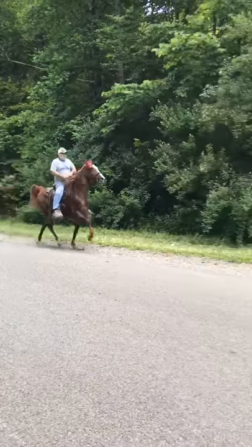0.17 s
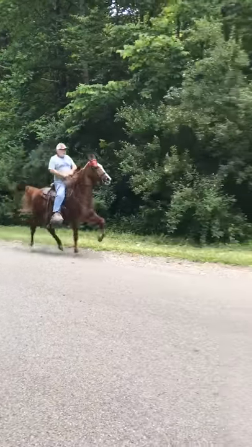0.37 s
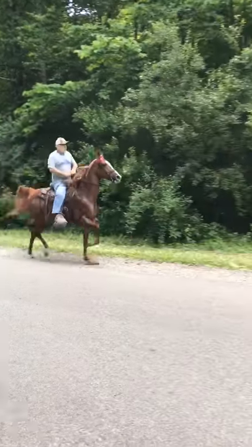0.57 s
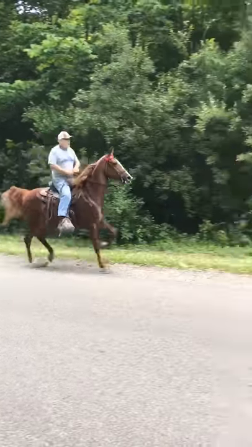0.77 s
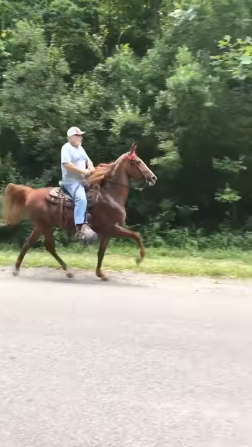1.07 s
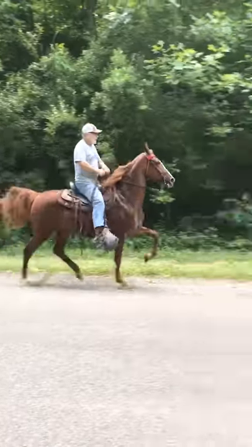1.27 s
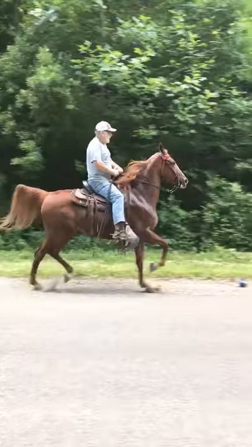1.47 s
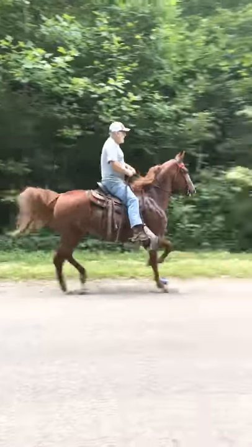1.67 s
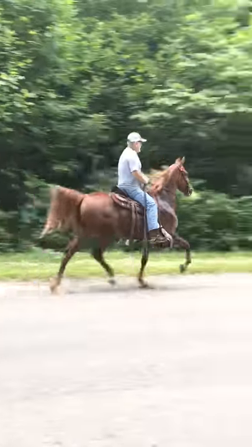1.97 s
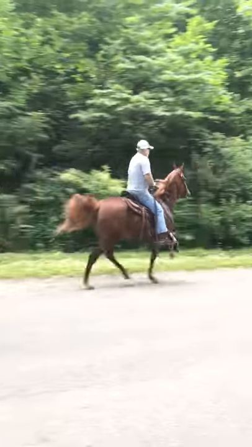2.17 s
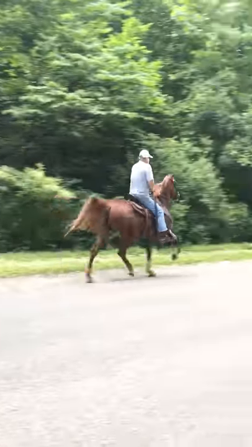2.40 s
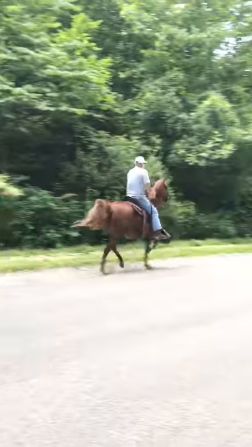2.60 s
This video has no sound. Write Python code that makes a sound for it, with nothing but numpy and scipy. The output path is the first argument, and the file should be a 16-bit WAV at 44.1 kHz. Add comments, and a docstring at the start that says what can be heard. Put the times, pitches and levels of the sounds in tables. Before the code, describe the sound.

Hoofbeats of one shod horse at a fast gait on asphalt, faint at first, then louder and close, with gritty scrapes between steps; low wind rumble and thin hiss outdoors, single handheld microphone at the roadside.

```python
"""Light wind rumbles on the microphone under a thin top hiss and a faint patter of hooves from the trees;
all the while a shod horse goes at a fast gait on a paved road, faint at first, louder from about 0.8 s.
Each hoof contact is a short gritty run of random knocks that rings broad resonances and pushes the road.
Shoes drag as fine grit, skidding shoes sing through one resonance, and ticks are brief bright noise.
Wind is low band noise with wobbling puffs; the air is coloured noise whose top flickers."""
import sys
import numpy as np
from scipy import signal
from scipy.fft import rfft, irfft
from scipy.io import wavfile

SR = 44100
rng = np.random.default_rng(int(sys.argv[2]) if len(sys.argv) > 2 else 0)


def master(y):
    """Save y as 16-bit WAV."""
    cut = np.clip(np.atleast_2d(y).T, -1, 1)
    pcm = np.round(cut * 32767)  # scale
    wavfile.write(sys.argv[1], SR, pcm.astype(np.int16))


N = 120834  # samples

FINE_GRAINS_PER_S = 2500  # for dragging shoes and the patter


def from_db(db):
    """Decibels to gain."""
    return 10 ** (np.asarray(db) / 20)


def rms_one(x):
    """Scale to rms 1."""
    return x / np.sqrt(np.mean(x ** 2) + 1e-20)


def in_time(rows):
    """Table columns, after the first in seconds, as curves over time."""
    seconds, *columns = np.transpose(rows)
    return [np.interp(np.arange(N) / SR, seconds, column) for column in columns]


def drift(rate_hz):
    """Slow random wander with rms 1: noise through two equal one-pole low-passes."""
    r = np.exp(-2 * np.pi * rate_hz / SR)
    wander = signal.lfilter([1], [1, -2 * r, r * r], rng.standard_normal(N + SR))
    return rms_one(wander[SR:])  # the first second lets the filter settle


def band_pass(x, edges_hz):
    """Steep-sided band between two edges."""
    return signal.sosfilt(signal.butter(3, edges_hz, "band", fs=SR, output="sos"), x)


def grains(per_s, spread_db):
    """Random clicks of uneven size and either sign, rms 1."""
    size_db = spread_db * np.minimum(rng.exponential(1, N), 4)
    sizes = from_db(size_db) * rng.choice([-1, 1], N)
    return rms_one(sizes * (rng.random(N) < per_s / SR))


def resonate(x, group):
    """Parallel resonances, each passed twice; unit noise in gives unit rms out."""
    pulse = np.zeros(4096)  # its response gives the gain of the whole group
    pulse[0] = 1
    both = np.concatenate([pulse, x + 1e-18])
    out = 0
    for k, (hz, width_hz, db) in enumerate(group):
        r = np.exp(-np.pi * width_hz / SR)
        b = [(1 - r * r) / 2, 0, (r * r - 1) / 2]
        a = [1, -2 * r * np.cos(2 * np.pi * hz / SR), r * r]
        ringing = signal.lfilter(b, a, signal.lfilter(b, a, both))
        out = out + (-1) ** k * from_db(db) * ringing
    return out[len(pulse):] / np.sqrt(np.sum(out[:len(pulse)] ** 2))


def wind():
    """Wind on the microphone: lumpy low noise in two bands."""
    # Each row: time in seconds, deep rumble in dB, upper rumble in dB.
    wind_levels = [(0, -52, -55), (.1, -44.5, -52), (.4, -43.5, -41.5), (.55, -41.5, -34.5),
                   (.8, -44.5, -42.5), (1.2, -43.5, -52), (1.75, -43, -50), (2.74, -41.5, -52)]
    deep_hz, upper_hz = (47.2, 122), (93, 252.7)
    gust_db, gust_rate_hz = 3.5, 12.0
    bands = [rms_one(band_pass(rng.standard_normal(N + SR), hz)[SR:]) for hz in (deep_hz, upper_hz)]
    rumble = 0
    for level_db, band in zip(in_time(wind_levels), bands):
        rumble = rumble + from_db(level_db + gust_db * drift(gust_rate_hz)) * band
    return rumble


def air():
    """Still air as steady coloured noise, with a top hiss that swells and flickers a little."""
    # Colour of the air. Each row: frequency in Hz, relative density in dB per Hz.
    air_colour = [(250, -36), (400, -18), (2200, -8), (5200, -20), (7600, -33), (10400, -37.5),
                  (14000, -29.5), (16800, -13.5)]
    # Gain of the top hiss. Each row: time in seconds, gain in dB.
    top_gain = [(1.6, -3), (1.8, 0.5), (2.4, -2.5)]
    air_db, top_from_hz = -54, 14500  # air_db is the rms before the top gain
    top_flicker_db, flicker_rate_hz = 2.5, 27
    hz = np.fft.rfftfreq(N, 1 / SR)
    at_hz, density_db = np.transpose(air_colour)
    colour = from_db(np.interp(np.log(hz + 1), np.log(at_hz), density_db)) * (hz > at_hz[0])
    noise = rfft(rng.standard_normal(N)) * colour
    scale = from_db(air_db) / np.std(irfft(noise, N))
    steady = irfft(noise * (hz < top_from_hz), N)
    top = irfft(noise * (hz >= top_from_hz), N)
    top_db = in_time(top_gain)[0] + top_flicker_db * drift(flicker_rate_hz)
    return scale * (steady + from_db(top_db) * top)


def patter():
    """Hooves returned by the trees: a blurred, flickering bed of grains to drive the hoof colours."""
    # Each row: time in seconds, level in dB.
    patter_levels = [(0, -40), (1.3, -35), (2.74, -37.5)]
    # Offsets in dB for the low, middle and high knock and the grit.
    patter_mix_db = [-17.5, -12, -8.5, -21.5]
    flicker_db, flicker_rate_hz, spread_db = 3.5, 20.0, 3.5
    level_db, = in_time(patter_levels)
    drives_db = [db + level_db + flicker_db * drift(flicker_rate_hz) for db in patter_mix_db]
    return from_db(drives_db) * grains(FINE_GRAINS_PER_S, spread_db)


def knock(x, edges_hz):
    """One broad, steep-sided resonance; unit noise in gives unit rms out."""
    low_hz, high_hz = edges_hz
    return band_pass(x + 1e-18, edges_hz) * np.sqrt(SR / 2 / (high_hz - low_hz))


def hoof(drives):
    """Three drives ring the hoof on the road, the fourth is grit; the lowest also pushes the road."""
    # Broad resonances, one per knock drive. Each row: low edge in Hz, high edge in Hz.
    knock_edges = [(530, 777), (940, 1205), (1330, 1735)]
    # Colour of crushed grit. Each row: centre in Hz, width in Hz, relative level in dB.
    grit_colour = [(2776, 820, 8.5), (3890, 2530, -7), (5006, 1880, -3.5), (8550, 1950, -26.5),
                   (13000, 3000, -26)]
    thud_hz, thud_width_hz, thud_db = 165, 199, -7.5  # level relative to the low knock
    rings = sum(knock(x, edges_hz) for x, edges_hz in zip(drives, knock_edges))
    grit = resonate(drives[3], grit_colour)
    thud = from_db(thud_db) * resonate(drives[0], [(thud_hz, thud_width_hz, 0)])
    return rings + grit + thud


def contacts():
    """Each hoof contact drives a burst of knocks and of grit: quick rise, hold, short release."""
    # Each row: start in seconds, length in seconds, low, middle and high knock in dB, grit in dB.
    landings = [(0.1, 0.0048, -38.5, -43, -36, -49), (0.122, 0.036, -46, -47, -39, -54.5),
                (0.212, 0.0078, -43, -39, -36.5, -50), (0.244, 0.0049, -36.5, -51, -41, -65),
                (0.37, 0.0038, -44, -41, -29.5, -42), (0.379, 0.0067, -43, -39, -36, -55),
                (0.412, 0.016, -35, -32, -38, -44.5), (0.578, 0.007, -40.5, -38, -35.5, -50),
                (0.587, 0.012, -39, -37, -36, -44.5), (0.645, 0.021, -40, -41, -35.5, -48.5),
                (0.823, 0.013, -33.5, -33.5, -20, -41.5), (0.864, 0.019, -32, -31, -30, -40.5),
                (0.886, 0.013, -58, -40, -34.5, -47.5), (1.03, 0.0091, -31.5, -27.5, -33.5, -43.5),
                (1.044, 0.0094, -44, -40, -28.5, -40), (1.108, 0.0059, -31, -33, -18, -36.5),
                (1.266, 0.018, -35, -51, -35, -45.5), (1.318, 0.014, -32.5, -29.5, -38.5, -45),
                (1.338, 0.0072, -31.5, -37, -29, -39.5), (1.373, 0.0075, -32.5, -49, -37, -41.5),
                (1.469, 0.0099, -27, -33, -27, -39.5), (1.559, 0.0044, -25.5, -24.5, -24.5, -38),
                (1.573, 0.014, -38, -27, -32.5, -46.5), (1.635, 0.0059, -44.5, -38, -36.5, -45.5),
                (1.694, 0.0082, -32.5, -32, -27.5, -44.5), (1.736, 0.018, -39, -35, -42, -45),
                (1.759, 0.016, -34.5, -41, -29, -43.5), (1.901, 0.024, -33, -32, -36, -43),
                (1.99, 0.00362, -19, -23, -24.5, -37), (2.081, 0.0049, -45, -35.5, -30, -46.5),
                (2.088, 0.023, -47, -42, -38.5, -49.5), (2.119, 0.017, -42, -43, -36, -44.5),
                (2.182, 0.009, -32.5, -24, -25.5, -38.5), (2.205, 0.014, -34, -27.5, -33.5, -39),
                (2.225, 0.01075, -44, -40, -30.5, -43), (2.353, 0.0036, -54, -29.5, -24, -61),
                (2.373, 0.013, -34.5, -31, -37, -46), (2.386, 0.0062, -64.5, -37, -32.5, -54),
                (2.455, 0.01, -33.5, -20.5, -27.5, -38), (2.591, 0.0042, -35, -29, -28.5, -44),
                (2.618, 0.014, -36.5, -27.5, -27, -41), (2.667, 0.0097, -41, -27.5, -34.5, -46)]
    knocks_per_s, knock_spread_db, grit_spread_db = 2500, 4, 2
    knock_rise, grit_rise, release_s = 0.42, 0.093, 0.0063  # rises are shares of the contact length
    clack_db = -2  # sparse hard clacks that drive every resonance at once
    lead_db = 13.5  # one firm knock at the top of the knock rise, over the grains
    spreads_db = [knock_spread_db] * 3 + [grit_spread_db]
    rises = np.array([[knock_rise]] * 3 + [[grit_rise]])
    sources = np.array([grains(knocks_per_s, db) for db in spreads_db])
    sources += from_db(clack_db) * grains(knocks_per_s / 10, knock_spread_db)
    drives = np.zeros((4, N))
    for start, length, *levels_db in landings:
        i = int(start * SR)
        t = np.arange(min(int((length + 6 * release_s) * SR), N - i)) / SR
        rise = np.minimum(t / length / rises, 1)
        fall = np.exp(-np.maximum(t - length, 0) / release_s)
        burst = sources[:, i:i + len(t)] * rise * fall
        burst[:, int(knock_rise * length * SR)] += from_db(lead_db)
        # the whole burst carries the energy of unit noise lasting one contact length
        energy = np.sum(burst ** 2, axis=1, keepdims=True)
        burst = burst * np.sqrt(length * SR / (energy + 1e-12))
        drives[:, i:i + len(t)] += from_db(levels_db)[:, None] * burst
    return drives


def puffs():
    """Puffs of wind hit the microphone: each a brief low wobble under a bell-shaped swell."""
    # Each row: centre in seconds, pitch in Hz, peak of the swell in dB, bell width (sigma) in seconds.
    puff_rows = [(0.115, 75, -19, 0.007), (.53, 105, -27, 0.02), (0.599, 159.2, -22.5, 0.011),
                 (.7, 129.6, -33.5, 0.048), (1.309, 103.2, -25, 0.0038), (1.43, 106.2, -31.5, 0.0068),
                 (2.12, 61.6, -27.5, 0.018)]
    t = np.arange(N) / SR
    turns = rng.random(len(puff_rows))  # random starting phases
    out = np.zeros(N)
    for (centre, hz, db, width), turn in zip(puff_rows, turns):
        swell = from_db(db) * np.exp(-.5 * ((t - centre) / width) ** 2)
        out += swell * np.cos(2 * np.pi * (hz * t + turn))
    return out


def slide(rows, spread_db):
    """Fine grit under a sliding shoe: random grains in strokes with soft edges."""
    edge_s = 0.016
    t = np.arange(N) / SR
    stroke = np.zeros(N)
    for start, length, db in rows:
        inside_s = np.minimum(t - start, start + length - t)
        stroke += from_db(db) * np.clip(inside_s / edge_s + .5, 0, 1)
    return stroke * grains(FINE_GRAINS_PER_S, spread_db)


def drags():
    """Shoes drag on the asphalt: sliding grains that drive the hoof resonances and grit."""
    # Each row: start in seconds, length in seconds, level in dB before the mix.
    drag_rows = [(0.323, 0.09, -45), (0.739, 0.075, -41.5), (0.916, 0.094, -50), (1.003, 0.048, -42.5),
                 (1.114, 0.02, -27), (1.2, 0.11, -41.5), (1.726, 0.031, -41.5), (1.812, 0.15, -42.5),
                 (2.005, 0.021, -39), (2.241, .11, -41.5), (2.477, 0.096, -50), (2.657, 0.0063, -27.5)]
    # Offsets in dB for the low, middle and high knock and the grit.
    drag_mix_db = [-9, -3, 0, -13.5]
    return from_db(drag_mix_db)[:, None] * slide(drag_rows, spread_db=0.5)


def skids():
    """A skidding shoe sings: sliding grains ring its resonance."""
    # Each row: start in seconds, length in seconds, level in dB.
    skid_rows = [(0.74, 0.064, -36.5), (1.385, 0.067, -36)]
    # Each row: resonance in Hz, width in Hz, relative level in dB.
    shoe_ring = [(1460, 200, 0)]
    return resonate(slide(skid_rows, spread_db=-2.0), shoe_ring)


def ticks():
    """Sharp ticks of shoe on stone: bright noise that dies within milliseconds."""
    # Each row: start in seconds, starting noise level in dB before the high-pass.
    tick_rows = [(1.318, -51), (1.37, -49), (2.2504, -55)]
    from_hz, decay_s = 1600, 0.0032
    starts = np.zeros(N)
    for start, db in tick_rows:
        starts[int(start * SR)] = from_db(db)
    envelope = signal.lfilter([1], [1, -np.exp(-1 / (decay_s * SR))], starts)
    bursts = envelope * rng.standard_normal(N)
    return signal.sosfilt(signal.butter(2, from_hz, "high", fs=SR, output="sos"), bursts + 1e-18)


def scene():
    """Hooves, wind and air in one channel."""
    hooves = hoof(contacts() + drags() + patter()) + skids()
    return (hooves + ticks() + wind() + puffs() + air())[None]


def record(dry):
    """The microphone channel's top is cut steeply, 60 dB down from the stop edge up."""
    stop_edge_hz = 17420
    return signal.sosfilt(signal.cheby2(26, 60, stop_edge_hz, fs=SR, output="sos"), dry)


dry = scene()
out = record(dry)
master(out)
```